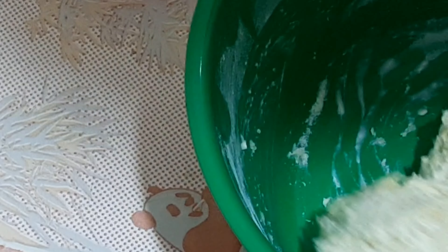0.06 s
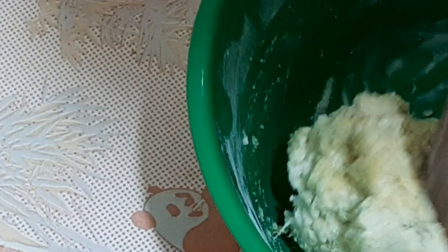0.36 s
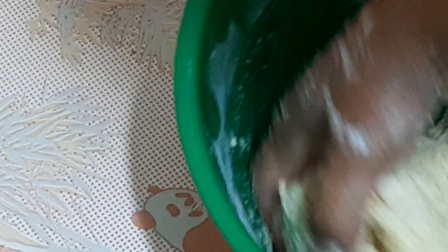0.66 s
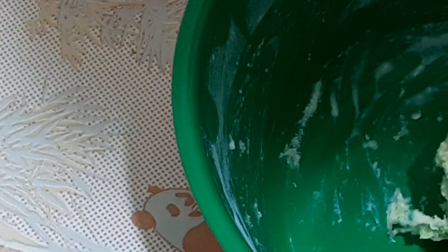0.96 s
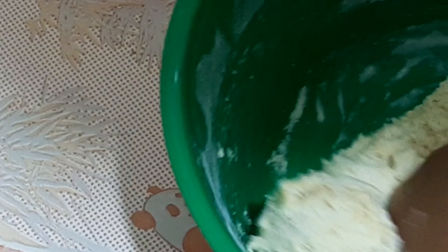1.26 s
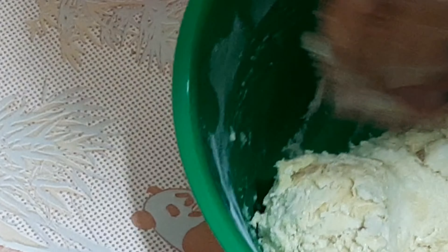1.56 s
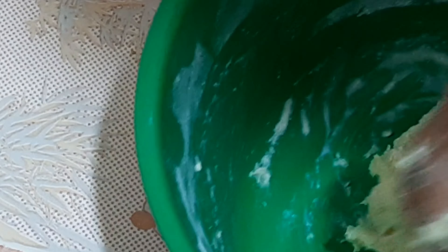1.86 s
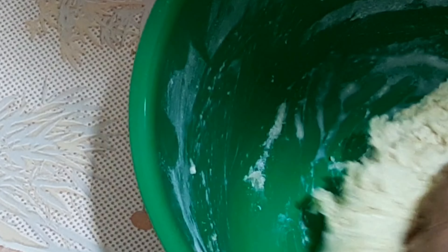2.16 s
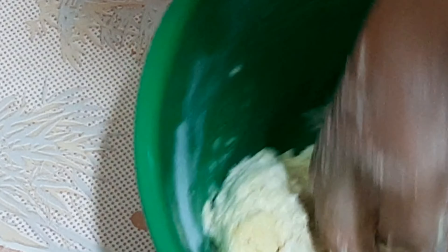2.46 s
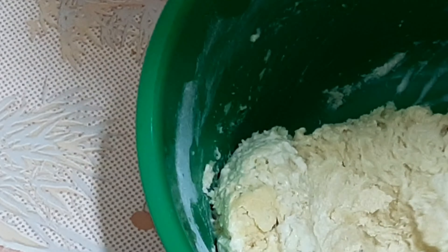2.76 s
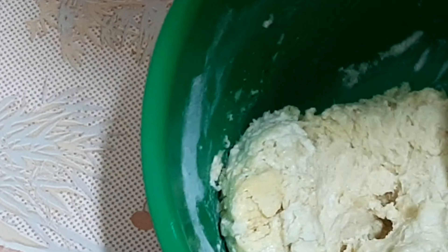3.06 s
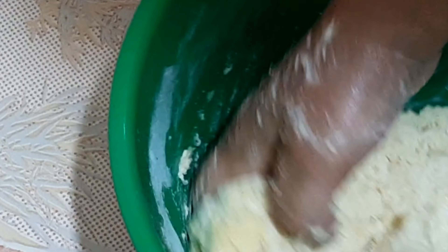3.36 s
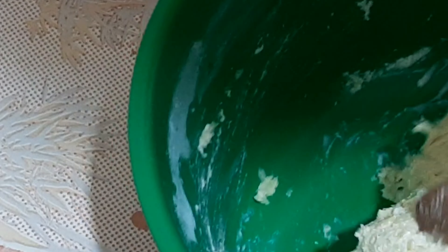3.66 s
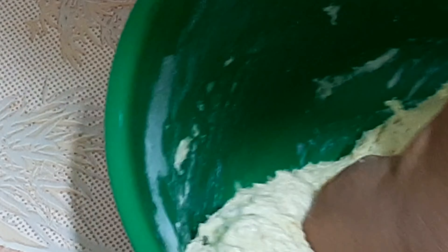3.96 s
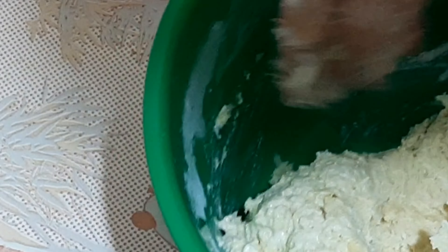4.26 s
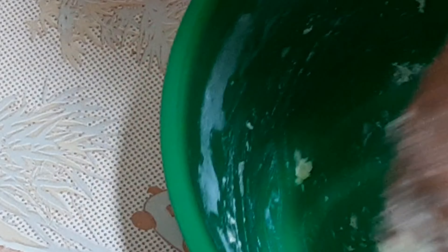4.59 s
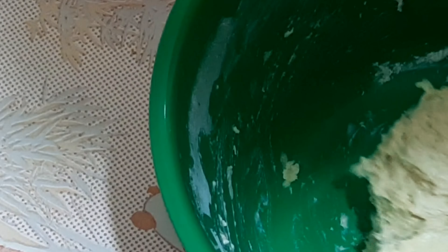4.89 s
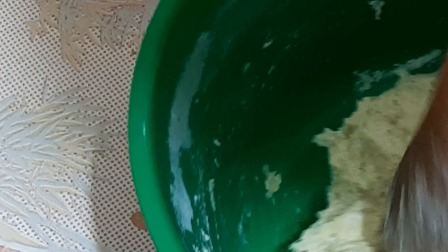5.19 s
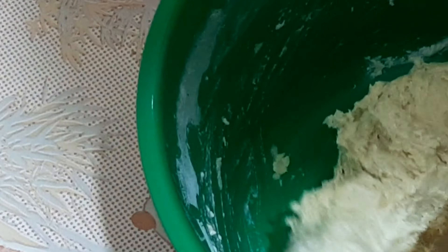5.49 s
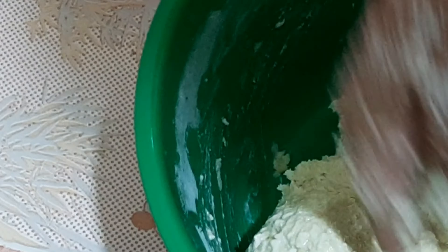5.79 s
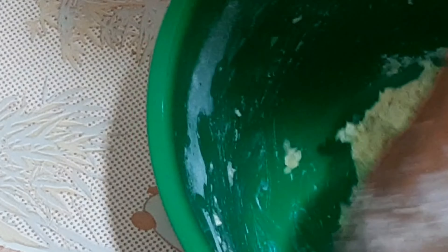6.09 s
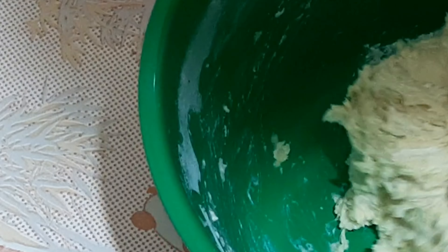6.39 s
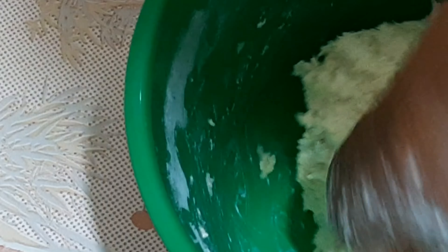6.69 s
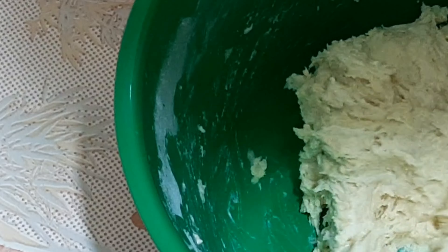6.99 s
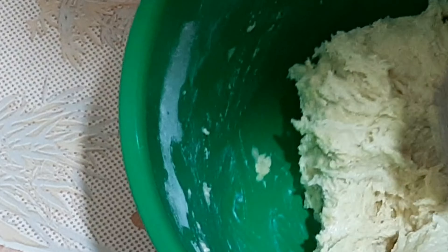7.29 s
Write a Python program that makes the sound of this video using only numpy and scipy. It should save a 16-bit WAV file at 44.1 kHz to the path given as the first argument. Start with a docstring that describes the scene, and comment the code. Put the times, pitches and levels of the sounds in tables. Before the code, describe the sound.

A hand kneads sticky dough in a plastic basin, with wet squelches, soft rubbing and irregular hollow knocks against a table.

```python
"""A bare kitchen, where a hand kneads sticky dough in a plastic basin on a table, close to a phone.
The hand drags the dough together, presses it down and lets go. Friction makes it rub and squeak;
its wet skin squelches, air pockets pop, strands snap and it peels off the wall. The pushes rock the
basin against the table and the lump flops onto its base, exciting the damped modes of basin and table.
The room reverberates, over a low hum and rumble."""
import sys
import numpy as np
from scipy import signal
from scipy.fft import rfft, irfft, next_fast_len
from scipy.io import wavfile
from scipy.ndimage import map_coordinates

SR = 44100
rng = np.random.default_rng(int(sys.argv[2]) if len(sys.argv) > 2 else 0)


def generate_wav(sig):
    """Save sig (samples, or channels by samples) to the path in sys.argv[1] as 16-bit PCM at SR."""
    pcm = np.round(np.clip(np.atleast_2d(sig).T, -1, 1) * 32767).astype(np.int16)
    wavfile.write(sys.argv[1], SR, pcm)


N = 332514

# Level of the low background rumble, which the phone's noise suppressor briefly ducks: t/s, level/dB
RUMBLE_ENVELOPE = [(0, -45), (0.85, -50.5), (1.35, -54.5), (2.0, -46.5), (2.8, -50), (2.9, -59),
                   (4.2, -48.5), (7.54, -53)]
# Level of the hum that enters late: t/s, level/dB
HUM_ENVELOPE = [(5.75, -84), (6.1, -57.5), (7.54, -53)]
# Spectra of the rumble and of the dough's rub, squelch, fizz and slap: f/Hz, relative level/dB
RUMBLE_SPECTRUM = [(20, -17.5), (55, -19.5), (88, 2), (130, -5), (175, -18), (450, -18), (2000, -47.5),
                   (16000, -43)]
RUB_SPECTRUM = [(70, -20.5), (130, -12.5), (430, 6.5), (700, 1), (1250, -2), (2000, -8.5), (4000, -33)]
SQUELCH_SPECTRUM = [(700, 5.5), (2000, 2.5), (3200, 1), (7500, 2.5), (16000, -129)]
FIZZ_SPECTRUM = [(2400, -26.5), (4500, -15.5), (8000, -16), (12000, -17)]
SLAP_SPECTRUM = [(900, 10.5), (2600, -2.5), (7000, -2.5), (11000, -14.5), (16000, -42)]
# The palm presses down: t/s at full pressure, rise time/s, squelch level/dB, rub level/dB
PALM_PRESSES = [(0.064, 0.044, -45.5, -41.5), (0.471, 0.074, -45, -43.5), (1.5, 0.1, -45.5, -53),
                (1.89, 0.066, -51, -49), (2.546, 0.067, -39, -35), (3.11, 0.17, -48.5, -48.5),
                (3.32, 0.012, -51, -41), (4.219, 0.1, -44, -38), (4.634, 0.092, -48, -48),
                (5.259, 0.051, -43, -41.5), (5.826, 0.072, -46.5, -55), (6.829, 0.046, -44.5, -34),
                (7.359, 0.058, -45, -43.5)]
# The fingers drag the dough together: start t/s, end t/s, squelch level/dB, rub level/dB
FINGER_DRAGS = [(0.084, 0.4, -61.5, -60), (0.663, 0.855, -58.5, -63), (0.9, 1.13, -63, -77),
                (1.117, 1.46, -58.5, -55), (1.714, 2.008, -57.5, -53.5), (2.168, 2.326, -55, -54),
                (2.91, 3.05, -63, -73), (3.37, 3.6, -53.5, -70), (3.684, 3.889, -57, -47),
                (3.984, 4.16, -56, -70), (4.382, 4.955, -60.5, -57.5), (4.955, 5.2, -55.5, -48),
                (5.508, 5.8, -55, -53.5), (5.991, 6.297, -58.5, -59.5), (6.346, 6.795, -56.5, -54),
                (7.06, 7.323, -57, -53.5), (7.474, 7.54, -76, -41)]
# Air pockets pop: t/s at the peak, f/Hz, swell time/s, glide/(Hz/s), level/dB
AIR_POCKETS = [(0.035, 540, 0.002, 0, -39.5), (2.191, 550, 0.00099, 10020, -30),
               (3.2395, 680, 0.00078, 0, -33), (4.162, 600, 0.0016, 0, -32),
               (4.2195, 574.6, 0.0011, 0, -19), (4.2205, 1180, 0.0025, 130000, -26.5),
               (4.9703, 520, .0011, 18000, -20.5), (5.1145, 2030, 0.0028, -2, -35.5),
               (6.5105, 600, 0.0014, 0, -33.5), (7.302, 507, 0.0032, 12011, -33.5),
               (7.3078, 560, .001, 10000, -26)]
# Single strands of dough part: t/s, centre f/Hz, level/dB
STRAND_SNAPS = [(1.465, 10400, -42), (2.187, 10000, -54), (3.0168, 12000, -42.5), (3.514, 11100, -46),
                (3.6519, 8700, -43.5), (4.0606, 4530, -43), (4.4463, 4380, -46.5), (5.114, 2180, -42.5),
                (5.721, 2400, -45.5), (6.3548, 8200, -45), (6.891, 2200, -44), (7.101, 2800, -44.5)]
# Dough tears loose in a bright spray, or the basin gives a soft low tap:
# t/s, duration/s, centre f/Hz, level/dB
TEARS_AND_TAPS = [(0.378, 0.0062, 4760, -38), (0.451, 0.0083, 8950, -34.5), (1.465, 0.003, 1830, -29.5),
                  (2.218, 0.016, 640, -37.5), (2.465, 0.0041, 1740, -36.5), (2.542, 0.013, 2440, -25.5),
                  (2.604, 0.0078, 1380, -51), (2.819, 0.0081, 650, -44), (3.105, 0.02, 5040, -34.5),
                  (3.297, 0.0097, 3060, -29.5), (4.126, 0.056, 2330, -35.5), (4.465, 0.022, 4660, -43),
                  (4.634, 0.0071, 4600, -40), (4.969, 0.017, 2690, -39.5), (5.108, 0.013, 9700, -35),
                  (5.222, 0.0051, 1860, -39), (5.793, 0.036, 10900, -36.5), (6.66, 0.008, 2580, -39.5),
                  (6.822, 0.0021, 1700, -39), (7.059, 0.0052, 834, -46.5), (7.346, 0.014, 5900, -34.5),
                  (7.523, 0.022, 3240, -33.5)]
# The basin strikes the table:
# t/s, contact time/s, base f/Hz, base level/dB, wall f/Hz, wall level/dB, slap level/dB
BASIN_KNOCKS = [(0.393, 0.00075, 664, -37, 950, -55, -49), (0.46, 0.0016, 716, -26.5, 927, -33, -36),
                (0.683, 0.001, 350, -41, 1000, -43.5, -45), (1.2, 0.00055, 596, -50.5, 745, -44.5, -76),
                (1.4653, 0.0007, 630, -24.5, 1210, -28.5, -38), (1.522, 0.00081, 520, -36, 910, -36, -35),
                (1.624, 0.002, 570, -32, 1010, -33, -44), (2.412, 0.0013, 570, -38.5, 1220, -45.5, -49),
                (2.542, 0.00099, 573, -25.5, 910, -27, -29), (2.565, 0.0018, 556, -27.5, 1064, -26, -60),
                (2.624, 0.0011, 463, -23, 1044, -22, -29), (3.048, 0.0011, 614, -29.5, 1030, -33.5, -40),
                (3.112, 0.0023, 570, -31.5, 1076, -41, -60), (3.232, 0.00048, 577, -41, 1130, -36, -41.5),
                (3.254, 0.0017, 425, -18.5, 1054, -14.5, -27.5), (3.304, 0.0011, 560, -26, 1034, -19, -39),
                (3.698, 0.0011, 660, -26.5, 970, -27, -42), (4.187, 0.00132, 516, -24.5, 1000, -34, -33),
                (4.358, 0.00091, 460, -26, 977, -21.5, -42.5), (4.804, 0.00082, 487, -25, 1043, -24, -40.5),
                (5.433, 0.00075, 580, -33.5, 1017, -28, -37),
                (5.966, 0.00063, 564, -35.5, 1065, -34, -50.5),
                (6.356, 0.00086, 407, -24, 1133, -26.5, -32.5), (6.803, 0.00061, 575, -31, 1040, -36, -40),
                (6.835, 0.0034, 724, -28, 997, -33, -55), (6.891, 0.00068, 377, -36, 1126, -39, -71),
                (7.454, 0.0011, 480, -24, 1150, -32.5, -28)]
# Modes of the table with its mat, and of the plastic rim: f/Hz, relative level/dB, T60/s
TABLE_MODES = [(137.4, 2, 0.14), (207.3, 1, 0.13), (311.8, -1.5, 0.15), (386.6, -3.5, 0.2)]
RIM_MODES = [(1243, -8.5, 0.008), (1439, -17.5, 0.021), (1907, -2.5, 0.0035)]
# Skin and dough slip on plastic: t/s at the peak, rise time/s, f/Hz, bandwidth/Hz, level/dB
SLIP_SQUEAKS = [(0.728, 0.01, 824, 500, -46.5), (0.761, 0.01, 1066, 122, -49),
                (1.11, 0.046, 729, 100, -55.5), (1.35, 0.067, 760, 65, -54), (1.73, 0.033, 835, 110, -50),
                (1.83, 0.04, 981, 260, -48.5), (2.02, 0.098, 850, 44.7, -55),
                (2.38, 0.039, 1370, 350, -55.5), (2.953, 0.025, 2630, 1300, -56.5),
                (4.48, 0.0043, 930, 250, -38.5), (5.691, 0.096, 2600, 890, -53.5),
                (6.295, 0.068, 1170, 71, -60)]
# The lump lands on the base: t/s, duration/s, low-pass corner f/Hz, level/dB
LUMP_FLOPS = [(2.572, 0.022, 200, -38), (2.63, 0.003, 600, -34), (2.807, 0.0093, 120, -46.5),
              (3.051, 0.0061, 169, -58), (4.206, 0.011, 300, -31), (4.358, 0.026, 300, -34),
              (5.216, 0.0081, 109, -32.5), (6.048, 0.0057, 203, -38.5), (7.453, 0.022, 600, -25.5)]
# Reverberation time of the kitchen: f/Hz, T60/s
REVERB_TIMES = [(120, 0.48), (1000, 0.48), (5000, 0.45), (14000, 0.33)]
# Frequency responses of the room and of the microphone: f/Hz, gain/dB
ROOM_RESPONSE = [(80, 13), (250, -3), (390, 5), (560, 0.5), (760, 2), (1030, -3.5), (1350, 2), (2500, 4.5),
                 (12000, 3)]
MICROPHONE_RESPONSE = [(7400, 0), (8000, -4), (8350, -16), (8900, -18), (10800, 0)]

WET_DB = -50  # reference squelch level; a stroke's wetness is its excess over this


def amp(db):
    """Amplitude ratio of a level in decibels."""
    return 10 ** (np.asarray(db) / 20)


def unit(x):
    """Normalise to rms 1."""
    return x / np.sqrt(np.mean(x ** 2) + 1e-20)


def burst(x):
    """Normalise a transient to the energy of 10 ms at rms 1."""
    return x * np.sqrt(.01 * SR / (np.sum(x ** 2, axis=-1, keepdims=True) + 1e-20))


def along(points, hz):
    """Interpolate (f/Hz, value) points on a logarithmic frequency axis."""
    f, values = np.transpose(points)
    return np.interp(np.log(hz + 1), np.log(f + 1), values)


def envelope(points):
    """Interpolate (t/s, level/dB) points at every sample."""
    return np.interp(np.arange(N) / SR, *np.transpose(points))


def wobble(rate):
    """Smooth random modulation with rate knots a second."""
    return map_coordinates(rng.standard_normal(int(N * rate / SR) + 4), [np.arange(N) * rate / SR])


def filtered(x, response):
    """Linear filtering: the spectrum of x times a frequency response."""
    n = x.shape[-1]
    size = next_fast_len(n + 4096)
    return irfft(rfft(x, size) * response(np.fft.rfftfreq(size, 1 / SR)), size)[..., :n]


def coloured(x, spectrum):
    """Spectral shaping by (f/Hz, level/dB) points."""
    return filtered(x, lambda hz: amp(along(spectrum, hz)))


def band(x, centre_hz, octaves):
    """Band-pass filtering, Gaussian in log frequency."""
    return filtered(x, lambda hz: np.exp(-.5 * (np.log2((hz + 1) / centre_hz) / octaves) ** 2))


def stereo(pair, side=1.0):
    """Sum and difference of two uncorrelated signals give left and right; side sets the width."""
    return np.array([pair[0] + side * pair[1], pair[0] - side * pair[1]])


def add(track, s, sound):
    """Superpose a sound on the track from time s."""
    start = max(0, round(s * SR))
    part = sound[..., :max(0, N - start)]
    track[:, start:start + part.shape[-1]] += part


def ring(t, hz, t60, attack):
    """Free decay of one damped mode, excited by a soft contact at t = 0."""
    t = np.maximum(t, 0)
    return np.sin(2 * np.pi * hz * t) * amp(-60 * t / t60) * (1 - np.exp(-(t / attack) ** 2))


def crackle(n, rate, spread_db, hiss):
    """Shot noise in two channels: tiny snaps of uneven size, rate a second, over a hiss."""
    impulses = (rng.random(n) < rate / SR) * amp(spread_db * np.clip(rng.standard_normal(n), -2, 2))
    return unit(unit(impulses * rng.standard_normal((2, n))) + hiss * rng.standard_normal((2, n)))


def background(hum_hz=57.5):
    """Ambient noise: a low rumble, briefly ducked by the phone's noise suppressor, and a pure-tone hum."""
    rumble = unit(coloured(stereo(rng.standard_normal((2, N)), side=0.1), RUMBLE_SPECTRUM))
    hum = amp(envelope(HUM_ENVELOPE) + 0.91 * wobble(5.7)) * np.sin(2 * np.pi * hum_hz * np.arange(N) / SR)
    return amp(envelope(RUMBLE_ENVELOPE) + 0.28 * wobble(5.4)) * rumble + hum


def stroke_levels(grab_s=0.011, release_db_per_s=169, rest_db=-71):
    """Squelch and rub levels/dB by power summation: presses build, drags hold, both decay on release."""
    t = np.arange(N) / SR
    release = lambda end: amp(-release_db_per_s * np.maximum(t - end, 0))
    strokes = [(np.exp(np.minimum(t - s, 0) / rise) * release(s), levels)
               for s, rise, *levels in PALM_PRESSES]
    strokes += [(np.clip((t - start) / grab_s, 0, 1) * release(end), levels)
                for start, end, *levels in FINGER_DRAGS]
    power = sum(np.outer(amp(levels) ** 2, shape ** 2) for shape, levels in strokes)
    return 10 * np.log10(power + amp(rest_db) ** 2)


def kneading():
    """Friction noise: the dough rubs round the basin in jerks, and its wet skin crackles under the palm."""
    squelch_db, rub_db = stroke_levels()
    wetness_db = squelch_db - WET_DB
    grip, stick = wobble(45), wobble(110)
    drag = crackle(N, rate=900, spread_db=3.5, hiss=1)
    pops = crackle(N, rate=900, spread_db=5, hiss=1.5)
    prickle = crackle(N, rate=800, spread_db=5, hiss=1.15)
    rub = unit(coloured(stereo(drag, side=0.74), RUB_SPECTRUM))
    squelch = unit(coloured(stereo(pops), SQUELCH_SPECTRUM))
    fizz = unit(coloured(stereo(prickle), FIZZ_SPECTRUM))
    rub *= amp(rub_db + 3.5 * grip)
    squelch *= amp(WET_DB + 1.15 * wetness_db + 0.5 * (grip + stick))
    fizz *= amp(-48 + 1.1 * wetness_db + 2 * (grip + stick))
    return rub * amp([[-1.5], [1.2]]) + (squelch + fizz) * amp([[-4.2], [1.4]])


def bubbles(echo_s=.0155, echo_db=-11.5, send_db=-7):
    """Cavity resonance: trapped air escapes with a hollow pop, rising in pitch where the pocket shrinks."""
    out, t = np.zeros((2, N)), np.arange(-SR // 50, SR // 25) / SR
    for s, hz, swell, glide, db in AIR_POCKETS:
        pitch = hz + hz / 2 * np.tanh(2 * glide * t / hz)
        u = t / swell
        shape = np.where(t < 0, np.exp(-.5 * u ** 2), np.exp(1 - np.hypot(1, 2 * u / 1.05)))
        pop = amp(db) * burst(np.sin(2 * np.pi * np.cumsum(pitch) / SR) * shape)
        add(out, s + t[0], pop * amp([[-3.5], [2.3]]) + amp(-3.5) * shudder(pop))
        add(out, s + t[0] + echo_s, amp(echo_db) * pop * amp([[2], [-2]]))  # off the nearest wall
    return out + room(amp(send_db) * out.mean(axis=0))


def shudder(x, t60=.017):
    """Scattering: the thin shell shudders on after a blow, and table and arm reflect its sound."""
    age = np.arange(len(x)) / SR
    scatter = stereo(rng.standard_normal((2, len(x))), side=0.53) * amp(-60 * age / t60) * (age > .003)
    return signal.fftconvolve(x[None], scatter / np.linalg.norm(scatter[0]), axes=1)[:, :len(x)]


def room(x, build_up_s=0.0013):
    """Reverberation: hard walls return a diffuse tail, which the moving arm and basin keep changing."""
    out, hop = np.zeros((2, N)), SR // 3
    for start in range(0, N, hop):
        hz, t, field = signal.stft(rng.standard_normal((2, 2 * SR // 3)), SR, nperseg=512)
        width = along([(130, 0.058), (500, 0.55), (2000, 1.0)], hz)  # the bass is nearly coherent
        decay_db = 60 * t / along(REVERB_TIMES, hz)[:, None]
        field = stereo(field, width[:, None]) * amp(along(ROOM_RESPONSE, hz)[:, None] - decay_db)
        tail = signal.istft(field, SR, nperseg=512)[1]
        onset = 1 - np.exp(-np.arange(tail.shape[1]) / SR / build_up_s)
        tail = tail * onset / np.sqrt(SR / 20)
        add(out, start / SR, signal.fftconvolve(x[None, start:start + hop], tail, axes=1))
    return out * amp([[-1], [1]])


def snaps(ticks_per_s=22, tick_hz=4200, t60=0.018):
    """Rupture: strands of dough part with a click; small ones tick at random, louder in wetter strokes."""
    out, t = np.zeros((2, N)), np.arange(SR // 60) / SR
    wetness_db = stroke_levels()[0] - WET_DB
    onsets = np.flatnonzero(rng.random(N) < ticks_per_s / SR)
    deviations = np.clip(rng.standard_normal((len(onsets), 2)), -2, 2)
    ticks = [(i / SR, tick_hz * 2 ** (.5 * pitch), -55 + 0.79 * wetness_db[i] + 3 * size)
             for i, (pitch, size) in zip(onsets, deviations)]
    for s, hz, db in STRAND_SNAPS + ticks:
        click = band(rng.standard_normal((2, len(t))) * amp(-60 * t / t60), hz, octaves=0.61)
        add(out, s, amp(db) * burst(stereo(click, side=0.95)))
    return out * amp([[-2.5], [1.5]])


def tears_and_taps():
    """Adhesive failure and light impact: dough peels off in a spray of snaps, or the basin taps softly."""
    out, t = np.zeros((2, N)), np.arange(SR // 12) / SR
    for s, length, centre_hz, db in TEARS_AND_TAPS:
        u = t / length
        noise = crackle(len(t), rate=5500, spread_db=5.5, hiss=0.64) * u * np.exp(-2.2 * u ** 2)
        add(out, s, amp(db) * burst(stereo(band(noise, centre_hz, octaves=0.86))))
    return out * amp([[-2.5], [1.5]])


def struck_modes(t, modes, attack):
    """Modal superposition, each mode's level and frequency varying a little from blow to blow."""
    total = np.zeros(len(t))
    for hz, db, t60 in modes:
        gain = amp(db + 2 * rng.standard_normal())
        total += gain * ring(t, hz * (1 + 0.047 * rng.standard_normal()), t60, attack)
    return burst(total)


def knocks(firm_db=-25, firm_contact_s=.001, base_cut_hz=170, slap_t60=0.01):
    """Impact: base and wall ring and the dough slaps; harder, shorter blows excite table and rim more."""
    out, t = np.zeros((2, N)), np.arange(-SR // 50, SR // 6) / SR
    for s, contact, base_hz, base_db, wall_hz, wall_db, slap_db in BASIN_KNOCKS:
        softness = np.log2(contact / firm_contact_s)  # doublings of contact time
        blow_db = 20 * np.log10(np.hypot(amp(base_db), amp(wall_db)))
        thud_db = -32 + 0.59 * (blow_db - firm_db) - 2.5 * softness
        rim_db = base_db - 10.5 - 7 * softness
        # the dough loads the basin's belly and damps its base at once
        belly = amp(-13) * burst(ring(t - 2 * contact, hz=408, t60=0.0094, attack=contact))
        base = burst(ring(t, base_hz, t60=.0075, attack=0.75 * contact))
        base = amp(base_db) * burst(filtered(base + belly, lambda hz: 1j * hz / (base_cut_hz + 1j * hz)))
        wall = amp(wall_db) * burst(ring(t, wall_hz, t60=0.019, attack=contact))
        wall += amp(rim_db) * struck_modes(t, RIM_MODES, attack=contact)
        thud = amp(thud_db) * struck_modes(t, TABLE_MODES, attack=3 * contact)
        slap = coloured(rng.standard_normal((2, len(t))), SLAP_SPECTRUM)
        slap *= amp(-60 * np.abs(t) / slap_t60) * (t > 0)
        slap = amp(slap_db) * burst(stereo(slap, side=0.81))
        # the base lies towards the right microphone port; the wall faces both
        direct = (base + slap) * amp([[-4], [2.6]]) + wall * amp([[-1.2], [1]]) + thud
        add(out, s + t[0], direct + amp(-6) * shudder(base + wall))
    return out


def squeaks(tighten_per_s=.16):
    """Stick-slip oscillation: a tone swells and stops, creeping up in pitch as the dough pulls tight."""
    out, t = np.zeros((2, N)), np.arange(-SR // 4, SR // 4) / SR
    for s, rise, centre_hz, width_hz, db in SLIP_SQUEAKS:
        waver = filtered(rng.standard_normal((2, len(t))), lambda hz: 1 / (1 + (2 * hz / width_hz) ** 2))
        phase = 2 * np.pi * centre_hz * t * (1 + tighten_per_s * t / 2)
        swell = np.exp(-.5 * (t / rise) ** 2)
        squeak = (waver[0] * np.cos(phase) + waver[1] * np.sin(phase)) * swell
        add(out, s + t[0], amp(db) * squeak * np.linalg.norm(swell) / np.linalg.norm(squeak))
    return out * amp([[-1.5], [1.5]])


def flops():
    """Forced vibration: the soft, heavy lump lands slowly and drives only the table's low modes."""
    out, t = np.zeros((2, N)), np.arange(SR // 4) / SR
    for s, length, corner_hz, db in LUMP_FLOPS:
        force = rng.standard_normal(len(t)) * np.exp(-(t / length) ** 2)
        table = np.zeros(len(t))
        for hz, mode_db, t60 in TABLE_MODES:
            response = signal.fftconvolve(force, ring(t, hz, t60, attack=0.01))[:len(t)]
            table += amp(mode_db) * burst(response) / (1 + (hz / corner_hz) ** 2)
        add(out, s, amp(db) * burst(table))
    return out


def scene(cut_hz=50):
    """Superposition of direct and reverberant sound: basin and dough close by, the room behind them."""
    # a small basin radiates little deep bass
    basin = filtered(knocks() + flops(), lambda hz: (1j * hz / (cut_hz + 1j * hz)) ** 2)
    handling = tears_and_taps() + snaps() + squeaks()
    send = amp(-4.5) * basin.mean(axis=0) + amp(-6.5) * handling.mean(axis=0)
    return basin + handling + bubbles() + kneading() + room(send) + background()


def record(dry):
    """Transduction: the phone's microphone notches the treble, clips at overload and limits the band."""
    top_hz = 15700
    sound = np.clip(coloured(dry, MICROPHONE_RESPONSE), -.97, .97)
    return filtered(sound, lambda hz: 1 / np.sqrt(1 + (hz / top_hz) ** 160))


dry = scene()
out = record(dry)
generate_wav(out)
```